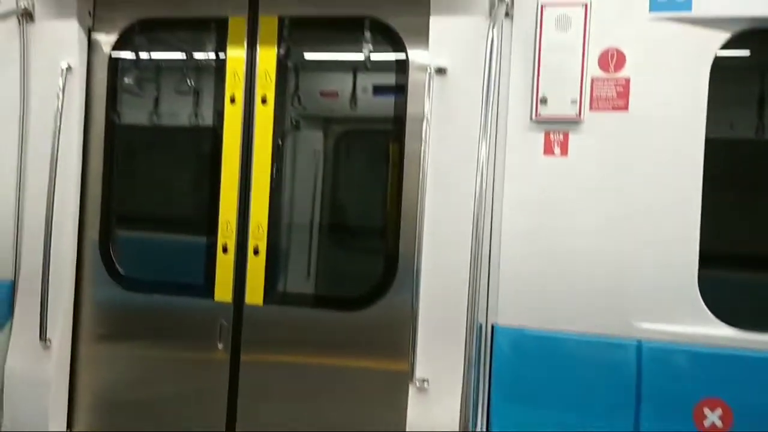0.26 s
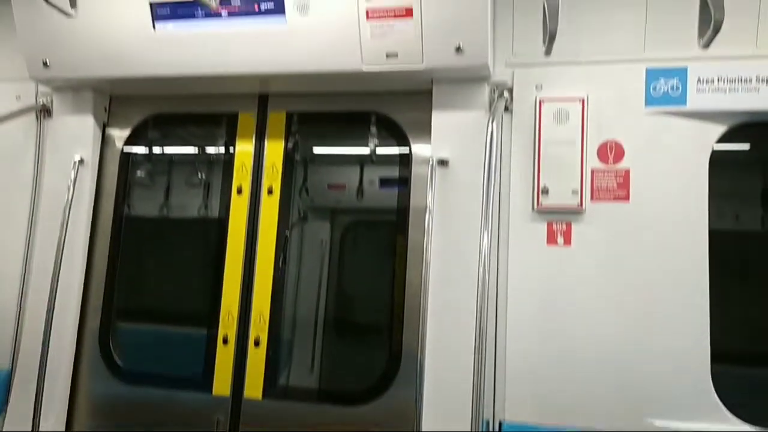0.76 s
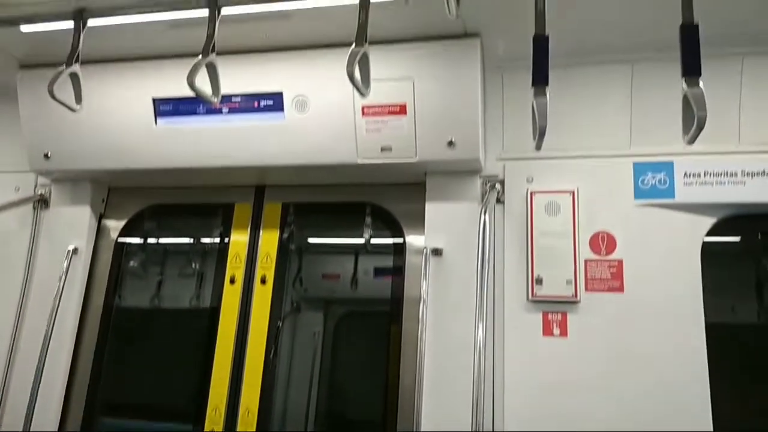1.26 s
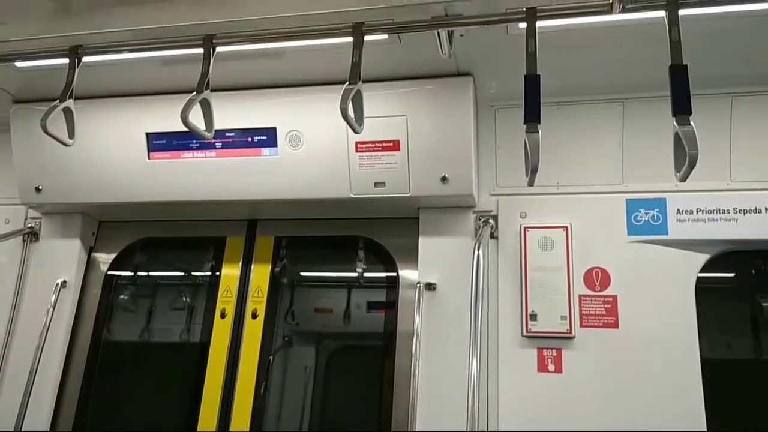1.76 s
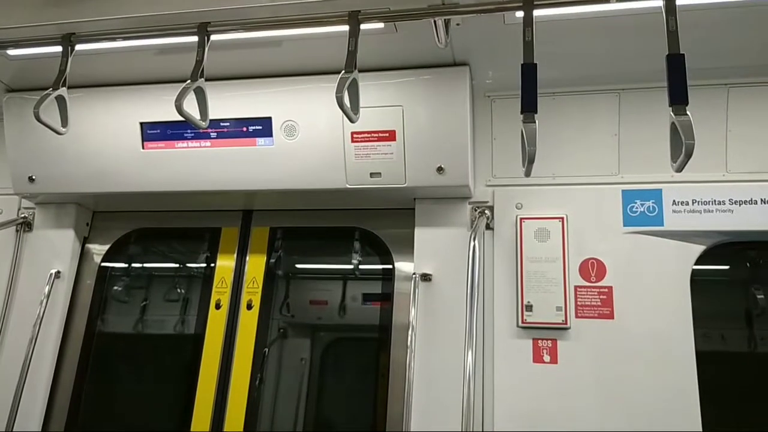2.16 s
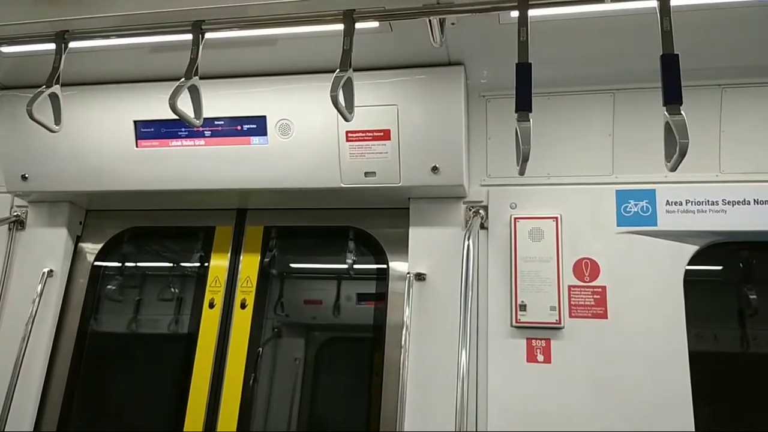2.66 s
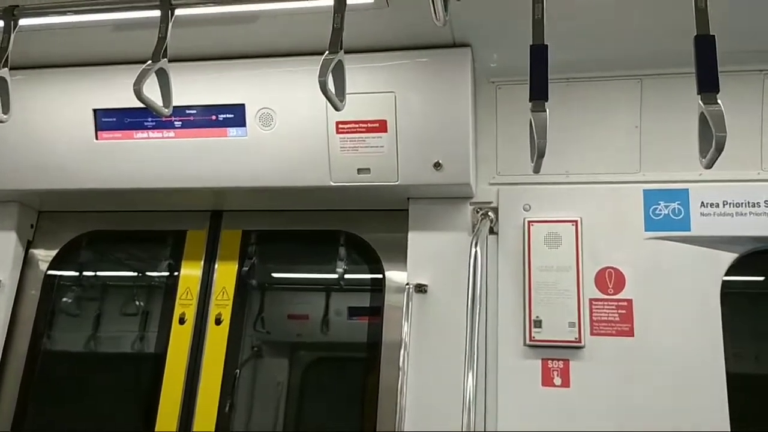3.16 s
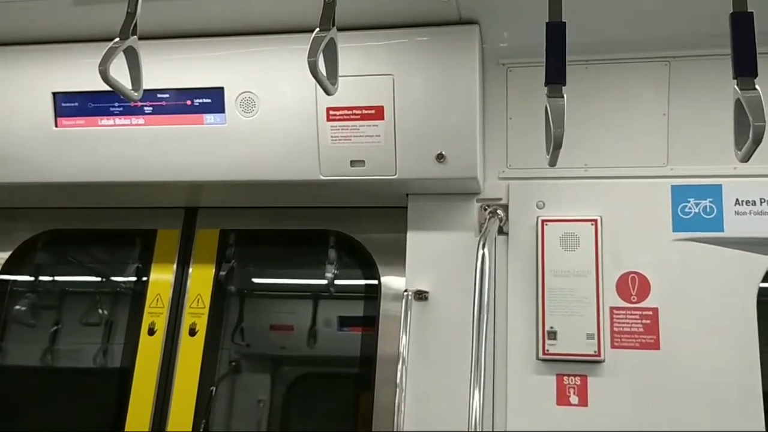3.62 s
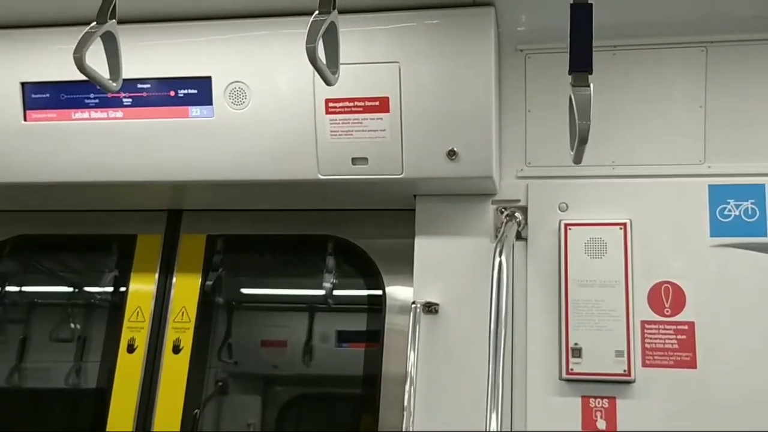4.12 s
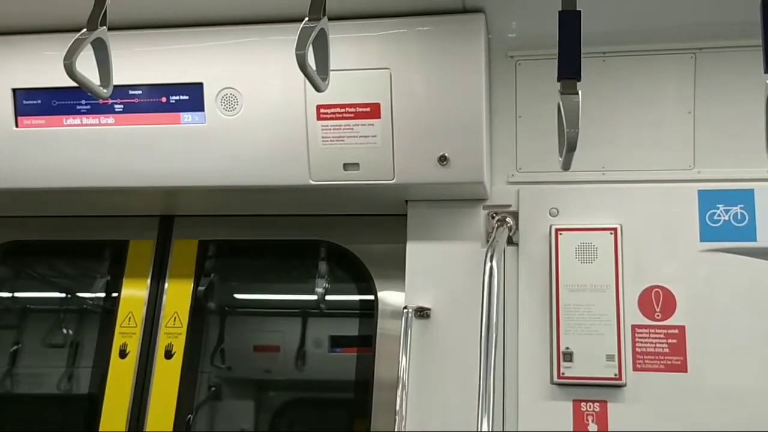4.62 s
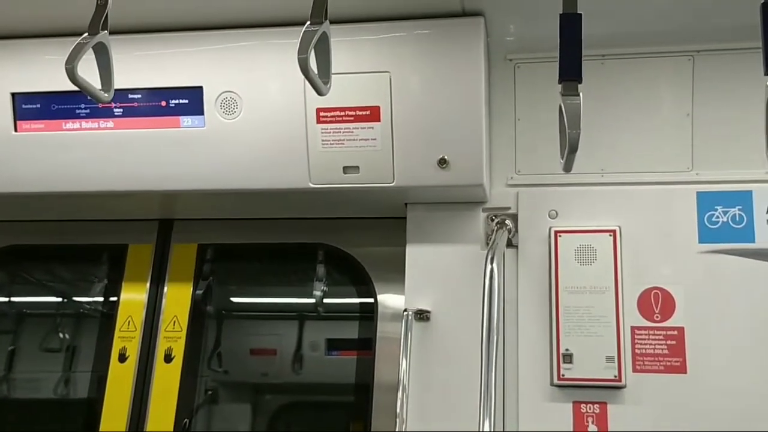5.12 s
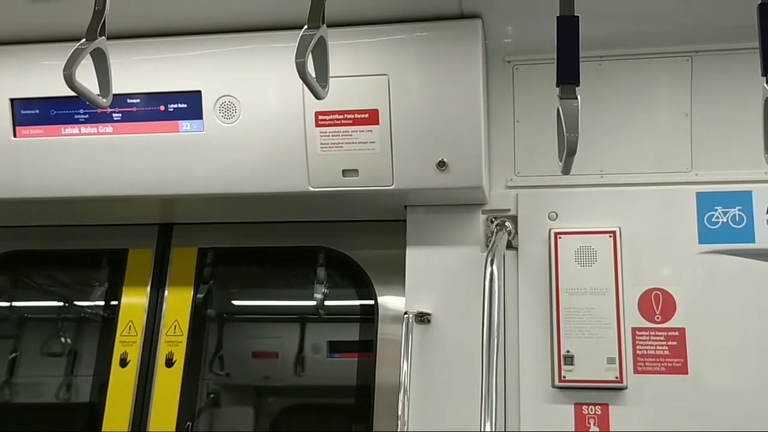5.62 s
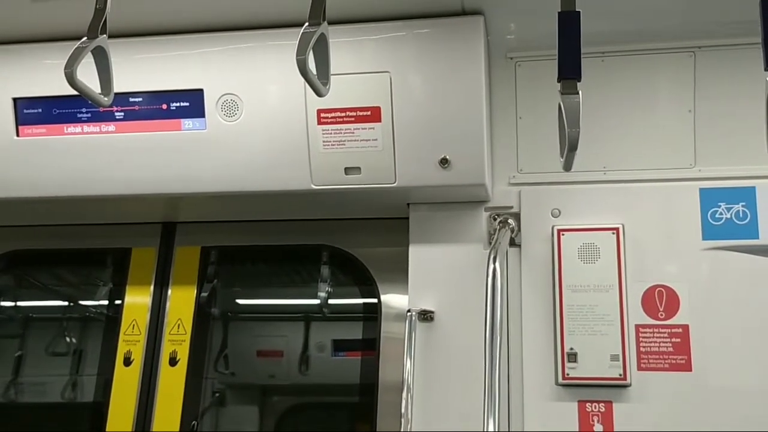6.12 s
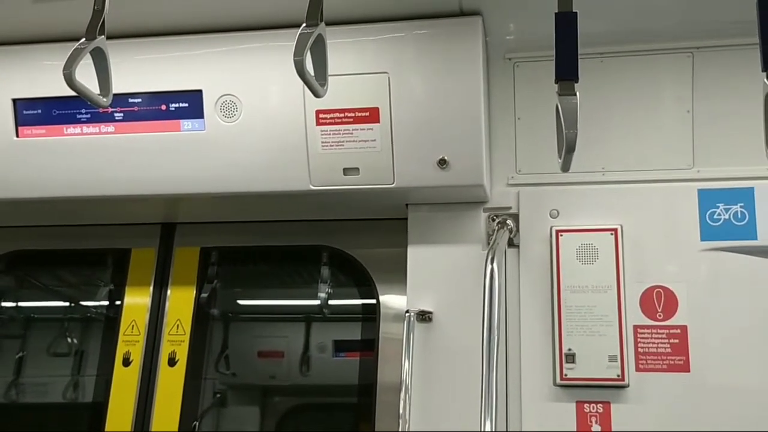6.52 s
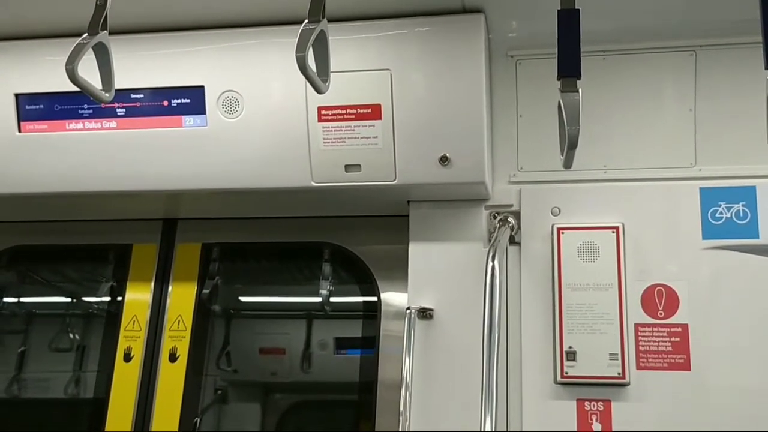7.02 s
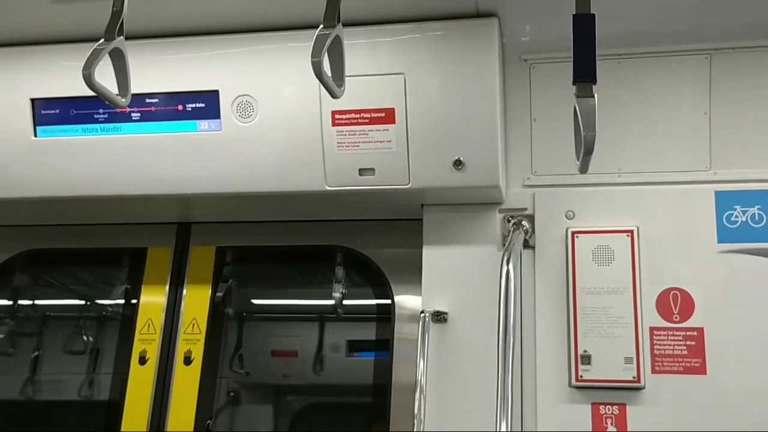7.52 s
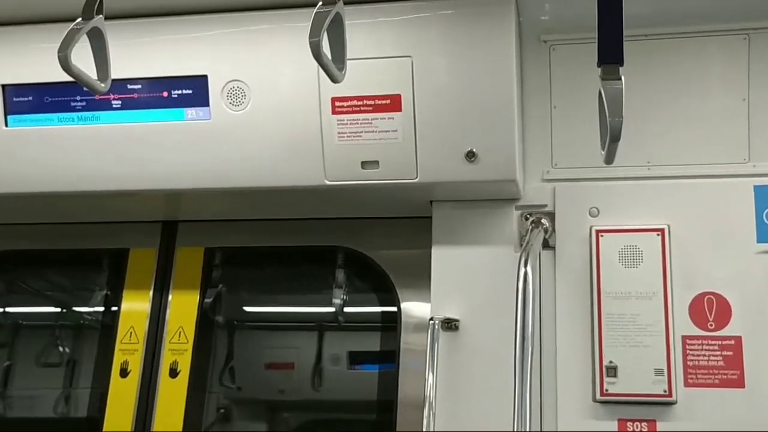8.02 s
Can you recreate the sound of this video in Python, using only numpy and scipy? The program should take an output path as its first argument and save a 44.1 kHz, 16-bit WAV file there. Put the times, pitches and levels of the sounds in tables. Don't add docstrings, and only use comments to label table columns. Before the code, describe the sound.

Inside a moving metro carriage in a tunnel, wheels and rails roar loudly and steadily from the first moment, surrounding two closely spaced microphones. Low floor rumble and a rougher metallic wheel hiss join it. Faint gear and fan hum lies beneath, with thin air hiss at the door seals. A few tiny door ticks come early; soft, blurred floor thumps become more frequent towards the end.

```python
import sys
import numpy as np
from scipy import signal
from scipy.fft import rfft, irfft, next_fast_len
from scipy.io import wavfile
from scipy.ndimage import uniform_filter1d, map_coordinates

SR = 44100
rng = np.random.default_rng(int(sys.argv[2]) if len(sys.argv) > 2 else 0)


def unload_audio(sound):
    columns = np.transpose(np.atleast_2d(sound))
    steps = np.round(np.clip(columns, -1, 1) * 32767)
    wavfile.write(sys.argv[1], SR, steps.astype(np.int16))


def gain_from_db(level_db):
    decades = np.asarray(level_db, float) / 20
    return 10 ** decades


N = 365059


def unit(x):
    return x / np.sqrt(np.mean(x ** 2) + 1e-20)


def along(points, hz):
    point_hz, value = np.transpose(points)
    return np.interp(np.log(hz + 1), np.log(point_hz + 1), value)


def curves(rows):
    point_s, *columns = np.transpose(rows)
    return [np.interp(np.arange(N) / SR, point_s, column) for column in columns]


def wobble(rate):
    knots = rng.standard_normal(int(N * rate / SR) + 4)
    return map_coordinates(knots, [np.arange(N) * rate / SR])


def filtered(x, response):
    size = next_fast_len(N + 8192)
    return irfft(rfft(x, size) * response(np.fft.rfftfreq(size, 1 / SR)), size)[..., :N]


SPACING_M, SOUND_SPEED_M_S = 0.17, 343


def diffuse(spectrum, patchy_db):
    pair = rng.standard_normal((2, N))
    if patchy_db:
        z = signal.stft(pair, nperseg=512)[2]
        field = uniform_filter1d(rng.standard_normal(z.shape[1:]), size=5, axis=0)
        field = uniform_filter1d(field, size=12, axis=1)
        pair = signal.istft(z * gain_from_db(patchy_db * unit(field)), nperseg=512)[1][:, :N]

    def mid_side_response(hz):
        alike = .95 * np.sinc(2 * hz * SPACING_M / SOUND_SPEED_M_S) * np.clip(hz / 55, 0, 1)
        side_share = np.sqrt((1 - alike) / (1 + alike))
        return gain_from_db(along(spectrum, hz)) * [np.ones_like(hz), side_share]

    mid, side = filtered(pair, mid_side_response)
    return np.array([mid + side, mid - side]) / np.std(mid)


# time_s, level_db
ROAR_LEVEL = [(0.0, -18.5), (0.04, -16.5), (2.33, -16.5), (2.51, -17.5), (2.83, -16.5), (5.0, -17),
              (6.23, -16), (6.25, -17), (6.48, -16.5), (6.73, -15.5), (6.78, -18), (6.8, -16.5),
              (8.21, -16), (8.28, -18)]
# pitch_hz, density_db
FLOOR_SPECTRUM = [(12, -56), (20, -49), (75, -4.5), (162, -2), (206, -1.5), (256, -3), (420, 1.5),
                  (550, -29.5), (920, -120)]
# pitch_hz, density_db
RAIL_SPECTRUM = [(250, -46.5), (420, -9.5), (455, -9), (493, -3.5), (593, -4.5), (788, 0), (916, -3),
                 (1020, 1.1), (1140, -1.5), (1300, -13), (1690, -44), (2860, -120)]
# pitch_hz, density_db
WHEEL_SPECTRUM = [(760, -27), (1300, -14), (1360, -3), (1700, 0.5), (1920, -6.5), (2300, -6.5),
                  (2680, -14.5), (3000, -13.5), (3550, -22), (3980, -22), (4250, -29.5), (4730, -30),
                  (5020, -37), (5350, -34.5), (7300, -37.5), (9490, -50), (16100, -120)]
RUMBLE_DB, RUMBLE_GROWS, RING_DB, RING_GROWS = -14, 1.3, -9, 0.6


def rolling():
    roar_db, = curves(ROAR_LEVEL)
    mean_db = roar_db.mean()
    swing_db = roar_db - mean_db
    track = wobble(8.1)
    rumble_db = mean_db + RUMBLE_DB + RUMBLE_GROWS * swing_db + 0.6 * wobble(5)
    ring_db = mean_db + RING_DB + RING_GROWS * swing_db + 0.16 * wobble(5.4)
    rumble = gain_from_db(rumble_db + 0.69 * track) * diffuse(FLOOR_SPECTRUM, patchy_db=0.85)
    roar = gain_from_db(roar_db + 0.22 * track) * diffuse(RAIL_SPECTRUM, patchy_db=0)
    ring = gain_from_db(ring_db + 1.0 * track) * diffuse(WHEEL_SPECTRUM, patchy_db=1.0)
    return rumble + roar + ring


# pitch_hz, width_hz, level_db
PANEL_RINGS = [(490, 25, -37.5), (556.5, 11.4, -39), (687, 8.1, -37), (997.6, 25, -31.5),
               (1072.5, 10, -39.5), (1725, 56, -42.5)]
# peak_s, pitch_hz, length_s, level_db
TRACK_DIPS = [
    (0.548, 490, 0.22, -30),
    (2.0, 278, .2, -33.5),
    (3.525, 280, 0.17, -29),
    (5.55, 70, 0.43, -45),
    (6.05, 406, .35, -32),
    (6.4, 250, .3, -39),
    (6.6, 520, 0.22, -27),
    (7.62, 370, 0.51, -34),
    (7.748, 775, 0.27, -30),
    (7.9, 153, 0.39, -37),
]
DIP_WIDTH = 0.19


def car_body():
    white = diffuse([(20, 0), (22000, 0)], patchy_db=0)
    hz, t, z = signal.stft(white, SR, nperseg=4096)

    def bell(x, centre, width):
        return np.exp(-(2 * (x - centre) / width) ** 2)

    def band(centre, width, db):
        density = gain_from_db(2 * db) * SR / (width * np.sqrt(np.pi))
        return density * bell(hz, centre, width)[:, None]

    def sway():
        return gain_from_db(2.3 * np.interp(t, np.arange(N) / SR, wobble(1.47)))

    power = sum(band(centre, width, db) * sway() for centre, width, db in PANEL_RINGS)
    for peak_s, centre, length_s, db in TRACK_DIPS:
        power = power + band(centre, DIP_WIDTH * centre, db) * bell(t, peak_s, length_s)
    return signal.istft(z * np.sqrt(power), SR, nperseg=4096)[1][:, :N]


# time_s, level_db
HISS_LEVEL = [(0.0, -49.5), (0.53, -45), (0.64, -48.5), (1.2, -48.5), (1.29, -45), (1.52, -50),
              (1.54, -48.5), (5.07, -50), (5.37, -48), (7.91, -50), (8.19, -50.5), (8.28, -48)]
# start_s, peak_db
LEAF_TICKS = [
    (1.2486, -37),
    (1.922, -43),
    (2.5794, -44),
]
# pitch_hz, density_db
SEAL_SPECTRUM = [(4290, -41), (7300, -11), (7870, -1.5), (8560, 0), (10000, -7.5), (13000, -43),
                 (22000, -120)]
# pitch_hz, density_db
FIZZ_SPECTRUM = [(5880, -21), (10000, -6), (11200, -2.5), (12600, -4), (13400, -8), (14000, -12)]
FIZZ_DB, FIZZ_GROWS = -8, .4


def seals():
    hiss_db, = curves(HISS_LEVEL)
    mean_db = hiss_db.mean()
    fizz_db = mean_db + FIZZ_DB + FIZZ_GROWS * (hiss_db - mean_db)
    flutter = 0.78 * wobble(5.5) + 0.52 * wobble(15) + 0.59 * wobble(30)
    t = np.arange(N) / SR
    ticks = sum(gain_from_db(db - 13 - 60 * np.abs(t - s) / .06) * (t > s) for s, db in LEAF_TICKS)
    hiss = gain_from_db(hiss_db + flutter) * diffuse(SEAL_SPECTRUM, patchy_db=1.0)
    fizz = (gain_from_db(fizz_db + .9 * flutter) + ticks) * diffuse(FIZZ_SPECTRUM, patchy_db=1.2)
    return hiss + fizz


def tone(hz, drift, swell_db):
    phase = 2 * np.pi * np.cumsum(hz) / SR + drift * wobble(8)
    return np.sqrt(2) * gain_from_db(swell_db * wobble(5)) * np.sin(phase)


# time_s, level_db
FAN_LOAD = [
    (0, -2.5),
    (.5, -4.5),
    (1.3, 1.5),
    (2.5, -1),
    (3.5, -4),
    (4.5, -2.5),
    (5.4, -2.5),
    (6.4, 3.5),
    (7.4, -2.5),
    (8.28, 2.5),
]
GEAR_HZ, GEAR_DB, BEAT_S, BEAT_PEAK_S, BEAT_DEPTH = 157.7, -41, 2.25, 0.38, 0.28
HUM_HZ, HUM_DB, HUNT_S, HUNT_START_S, HUNT_HZ = 198.8, -40, 5.21, 1.384, 1.407


def machinery():
    t = np.arange(N) / SR
    beat = 1 + BEAT_DEPTH * np.cos(2 * np.pi * (t - BEAT_PEAK_S) / BEAT_S)
    gear = gain_from_db(GEAR_DB) * beat * tone(np.full(N, GEAR_HZ), drift=0.42, swell_db=2.2)
    hunt_hz = HUM_HZ + HUNT_HZ * np.cos(2 * np.pi * (t - HUNT_START_S) / HUNT_S)
    load_db, = curves(FAN_LOAD)
    return gear + gain_from_db(HUM_DB + load_db) * tone(hunt_hz, drift=0.6, swell_db=1.5)


def scene():
    return rolling() + car_body() + seals() + machinery()


# pitch_hz, level_db
MIC_TILT = [(60, 5), (110, 5.5), (200, 5.5), (370, 4.5), (670, -1), (1220, 0.5), (2230, 0), (4070, 0.5),
            (7430, 0), (13600, 9)]
CEILING, KNEE = 0.8, 7.6


def microphones(dry):
    x = filtered(dry, lambda hz: gain_from_db(np.outer([.5, -.5], along(MIC_TILT, hz))))
    return x / (1 + np.abs(x / CEILING) ** KNEE) ** (1 / KNEE)


# pitch_hz, level_db
PATCH_THRESHOLD = [(3900, -14), (4250, -3), (4700, -3), (5000, .5), (5300, -1.5), (7300, -2), (7900, -9),
                   (9600, -8), (10400, -3.5), (13200, -3), (14000, -2)]
THRESHOLD_UNREST_DB, SHUT_DB = 2.5, -40
EDGE_HZ, EDGE_STEP_HZ, EDGE_RATE = 14290, 345, 16
FRAME, FRAME_START = 1024, 612


def thinned(x):
    window = signal.windows.kaiser_bessel_derived(2 * FRAME, 4 * np.pi)
    lead = FRAME - FRAME_START
    sum_gap = np.pad([x[0] + x[1], x[0] - x[1]], [(0, 0), (lead, 0)])
    hz, t, z = signal.stft(sum_gap, SR, window, 2 * FRAME)

    def patch(v):
        return uniform_filter1d(v, size=9, axis=1)

    power = np.abs(patch(np.abs(z) ** 2))
    running = uniform_filter1d(uniform_filter1d(power, size=9, axis=2), size=15, axis=1)
    unrest_db = THRESHOLD_UNREST_DB * unit(patch(rng.standard_normal(z.shape)))
    threshold_db = along(PATCH_THRESHOLD, hz)[:, None] + unrest_db
    shut = (power < gain_from_db(2 * threshold_db) * running) & (hz[:, None] > PATCH_THRESHOLD[0][0])
    edge_wobble = np.interp(t, np.arange(N) / SR, wobble(EDGE_RATE))
    steps = np.clip(np.round(1.3 * edge_wobble), 0, 3)
    shut = shut | (hz[:, None] > EDGE_HZ - EDGE_STEP_HZ * steps)
    z = z * np.where(shut, gain_from_db(SHUT_DB), 1)
    total, gap = signal.istft(z, SR, window, 2 * FRAME)[1][:, lead:lead + N]
    return np.array([total + gap, total - gap]) / 2


def roll_off(x):
    return signal.sosfilt(signal.butter(12, 14290, fs=SR, output="sos"), x)


def record(dry):
    mix = thinned(microphones(dry))
    return roll_off(mix)


dry = scene()
out = record(dry)
unload_audio(out)
```